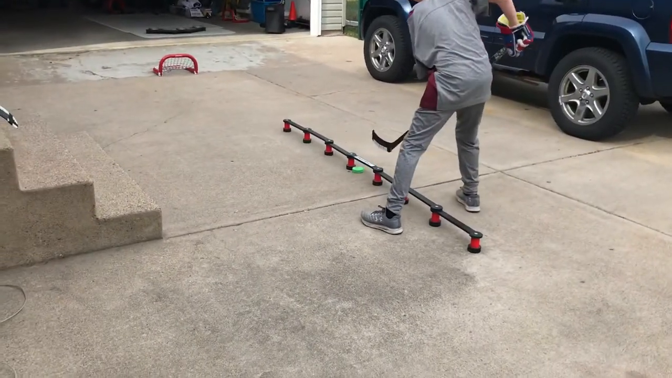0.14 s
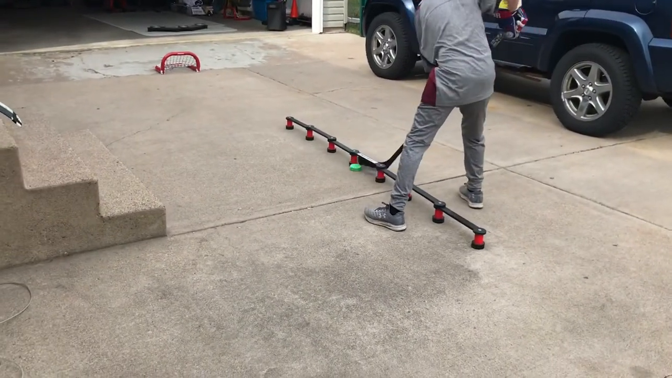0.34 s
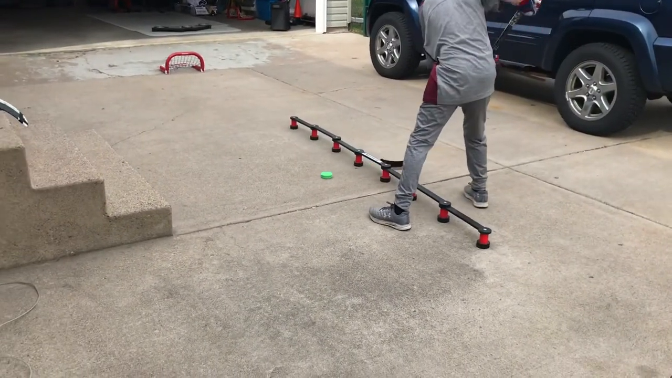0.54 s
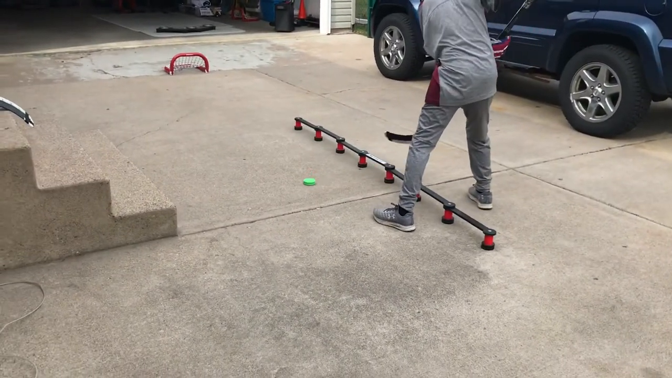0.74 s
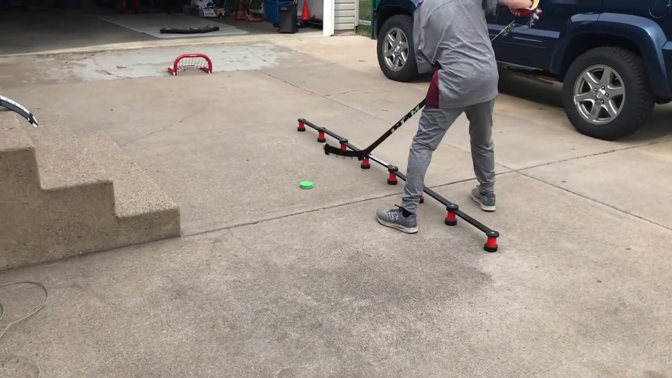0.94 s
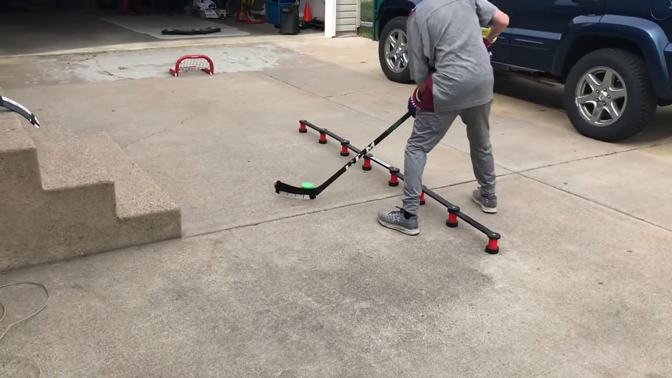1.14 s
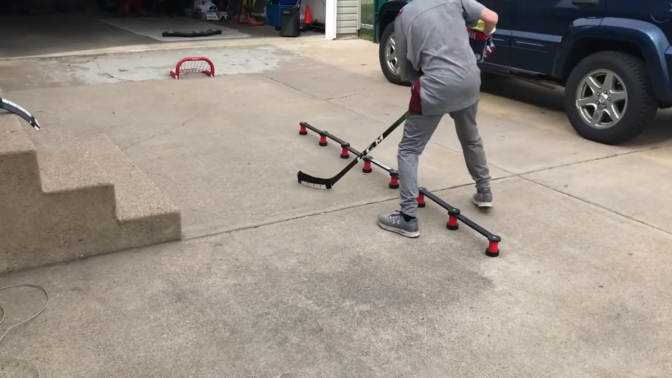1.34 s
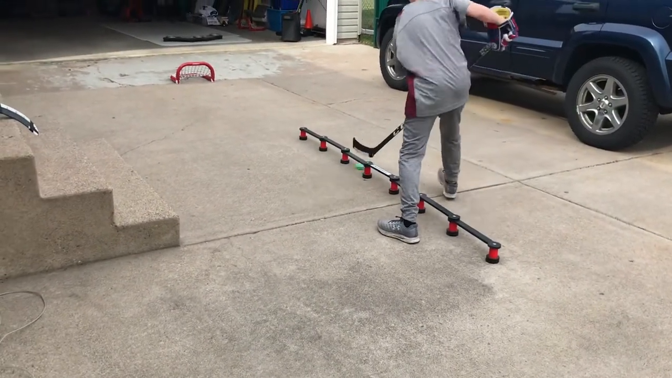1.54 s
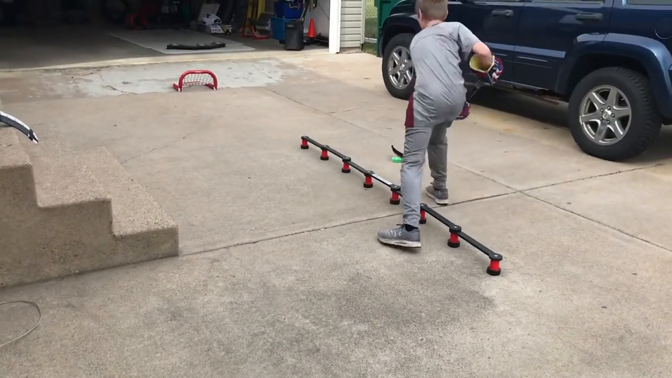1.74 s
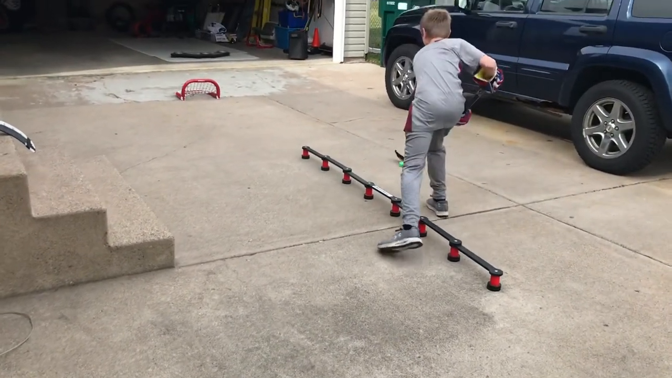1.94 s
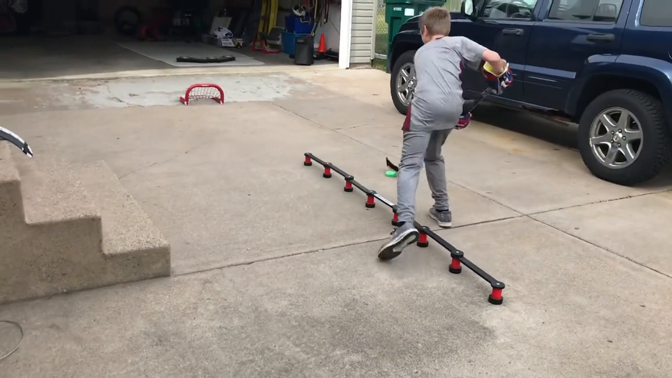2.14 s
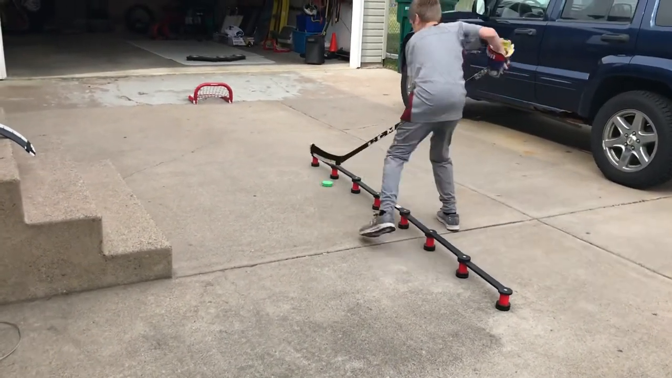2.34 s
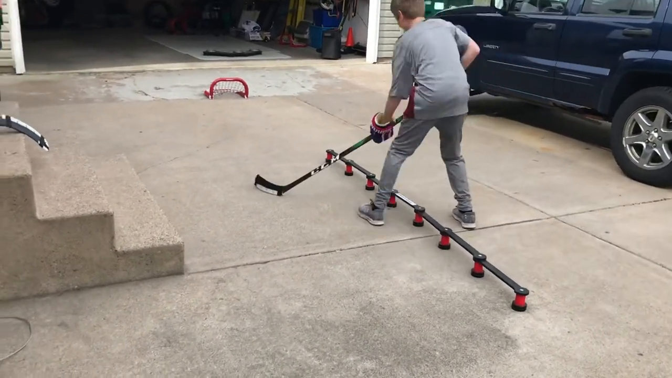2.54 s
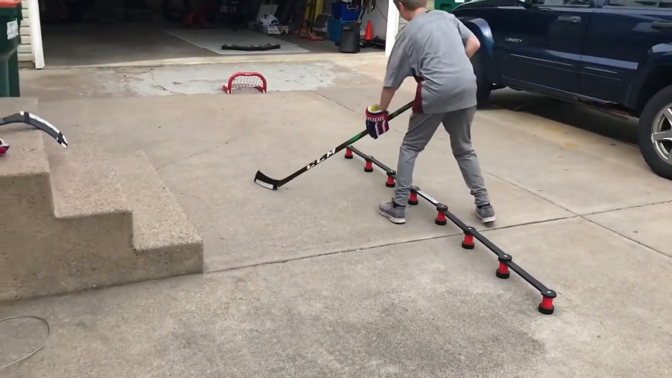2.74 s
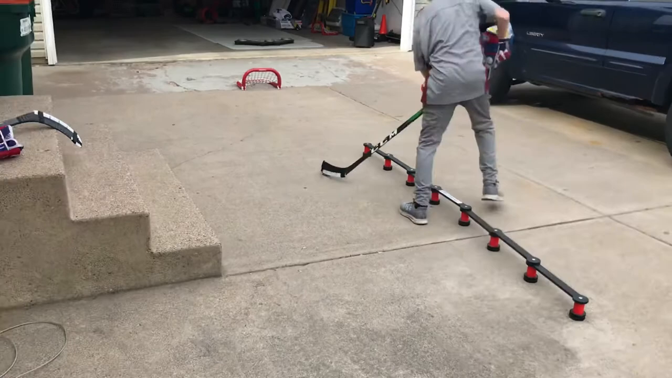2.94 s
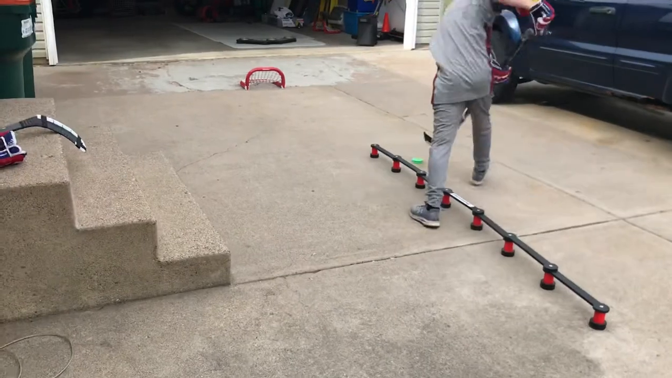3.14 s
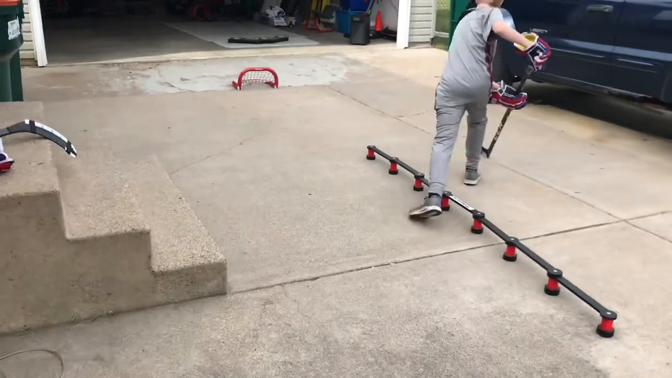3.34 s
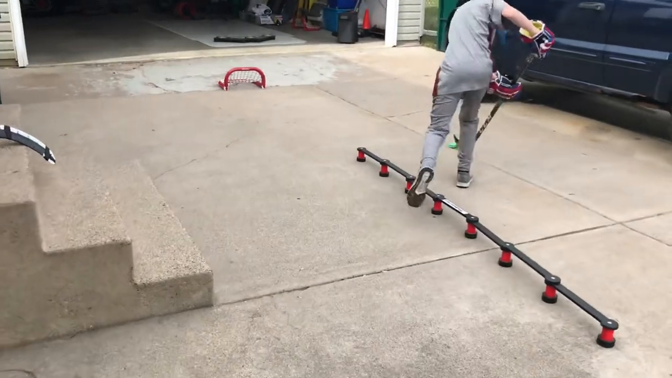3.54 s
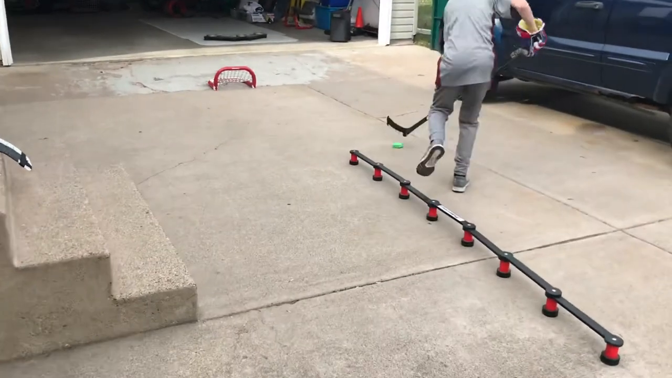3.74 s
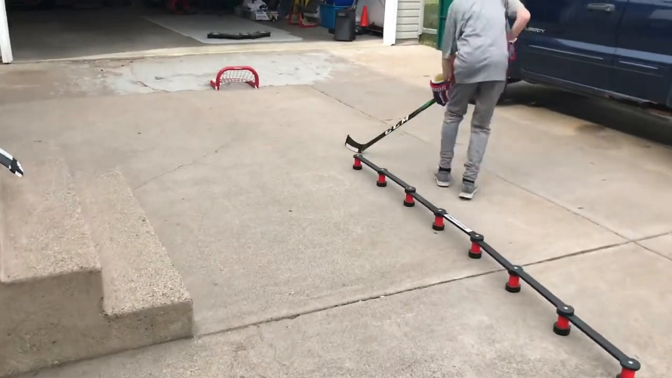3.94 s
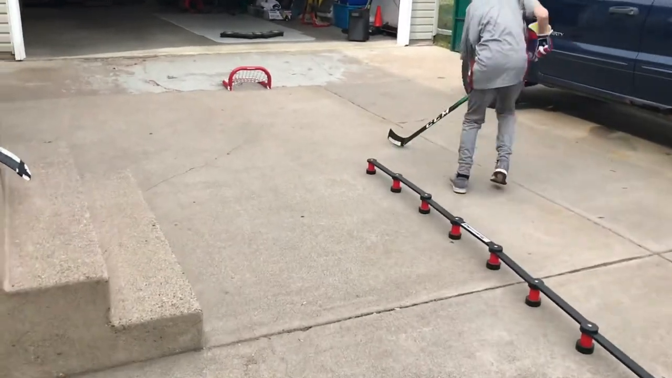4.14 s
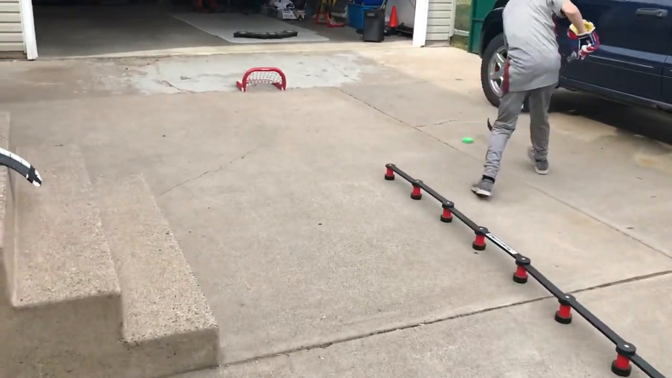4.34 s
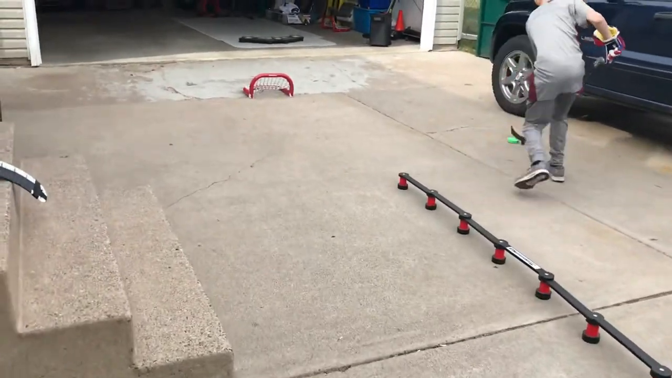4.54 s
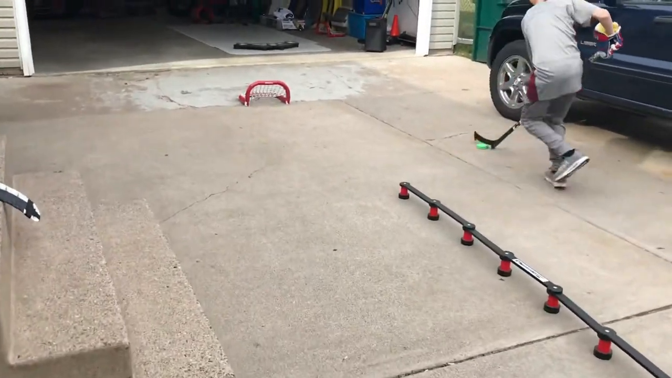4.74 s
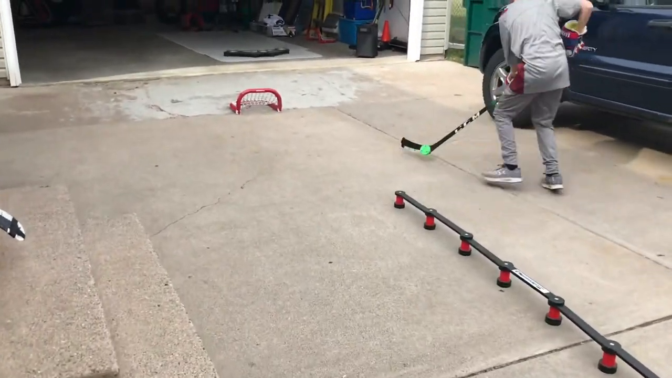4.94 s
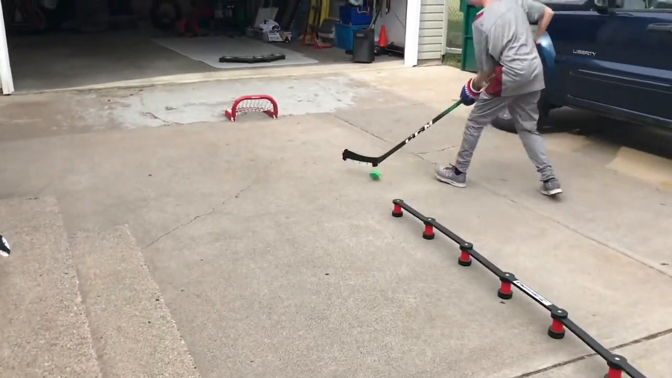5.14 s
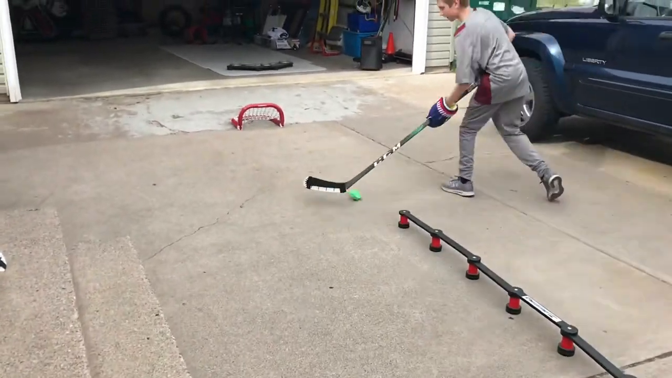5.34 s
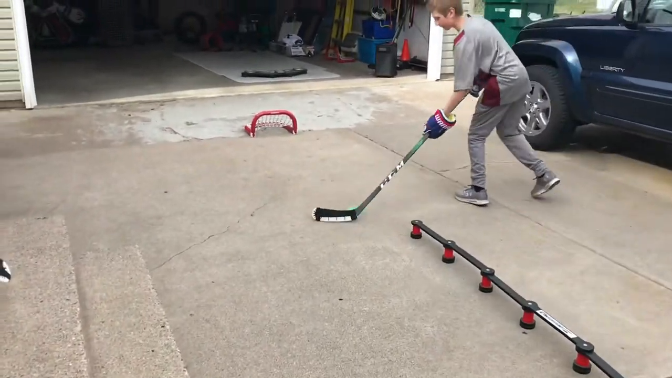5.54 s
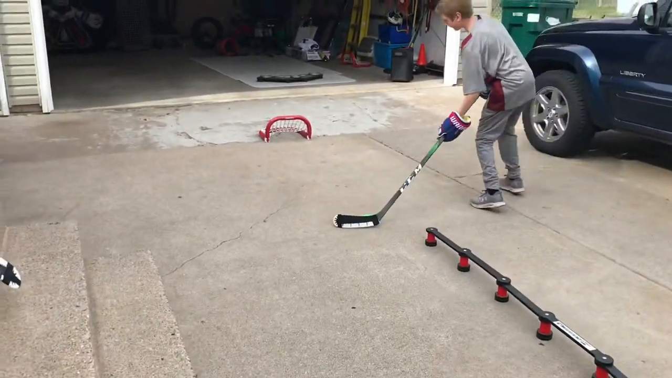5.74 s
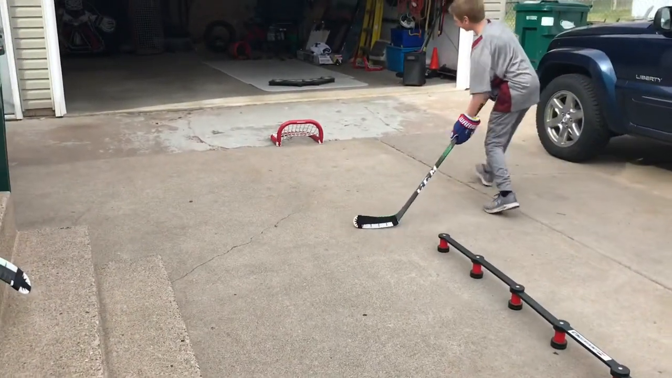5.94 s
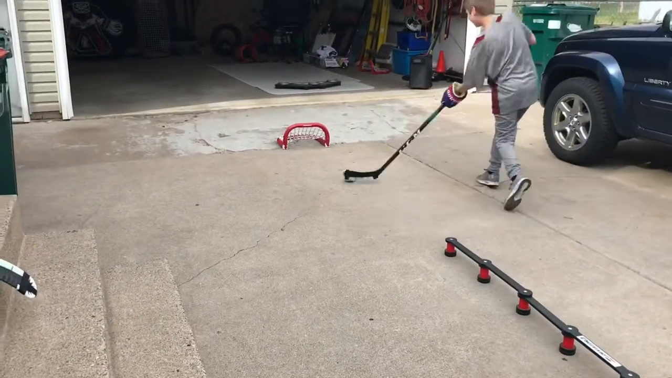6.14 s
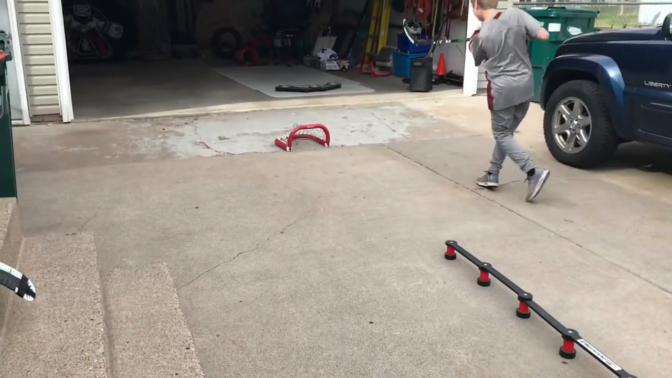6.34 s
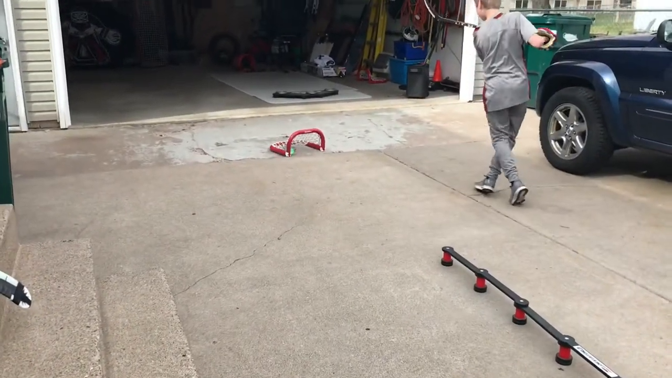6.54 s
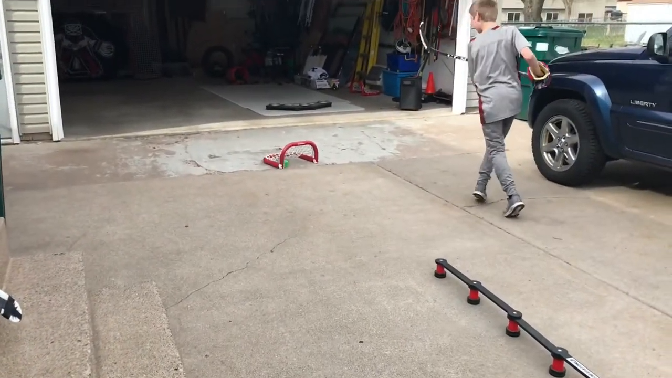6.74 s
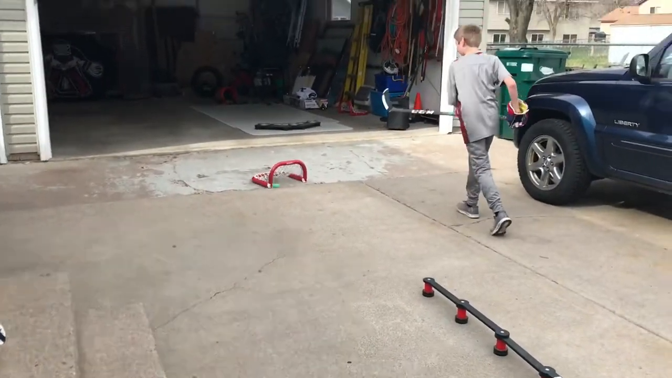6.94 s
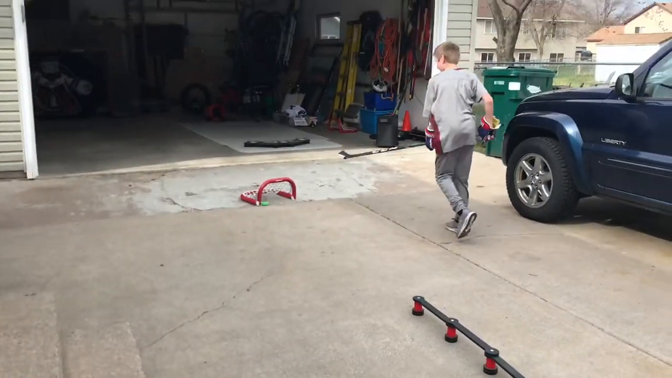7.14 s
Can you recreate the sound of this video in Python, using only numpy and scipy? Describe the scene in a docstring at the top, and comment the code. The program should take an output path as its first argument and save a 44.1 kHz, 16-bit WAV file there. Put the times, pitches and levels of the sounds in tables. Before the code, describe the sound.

A quiet driveway with low distant traffic, faint engine hum and soft wind puffs, heard from a few metres away. Two hollow stick knocks come at 0.25 and 0.3 s, then a thin gritty puck slide fades until 0.85. After a short lull, a scrape at 1.2 leads into a double knock, another raspy, ringing slide and small clacks. Knocks at 1.7, 2.5 and 2.85 alternate with slides and brief scrapes. From 3.3 the puck chatters on its rim, with taps near 3.9, 4.5 and 4.85 and light clacks between. Sharp plastic clacks land at 5.1 to 5.4. A gritty drag swells from 5.8 to 6.1, and at 6.2 the shot slams into a small steel goal: a very loud, bright, rattling crash in quick bursts. A rebound clack at 6.46 and smaller clatters die in short garage echo; one faint rising bird whistle sounds at 6.7, then quiet.

```python
"""A hard plastic puck is stickhandled over a concrete driveway, heard from a few metres away.
Blade blows excite resonances of shaft and blade; random grains make the blade scrape and the puck rasp and ring.
The puck also skips, wobbles and clacks; a long scrape ends in a shot that crashes into a small steel goal
and clatters on. Decaying random reflections give the yard and the open garage their echoes.
Behind it: shaped noise for traffic, wavering engine notes, puffs of wind and one faint bird whistle."""
import sys
import numpy as np
from scipy import signal
from scipy.fft import rfft, irfft
from scipy.io import wavfile
from scipy.ndimage import uniform_filter1d

SR = 44100
rng = np.random.default_rng(int(sys.argv[2]) if len(sys.argv) > 2 else 0)


def int16_out(signal):
    """Quantize to a 16-bit WAV file."""
    q = np.round(np.clip(np.atleast_2d(signal).T, -1, 1) * 32767)
    wavfile.write(sys.argv[1], SR, q.astype(np.int16))


N = 321048
TIME = np.arange(N) / SR  # seconds
BINS = np.fft.rfftfreq(4096, 1 / SR)  # Hz
HIT_SPAN = .02  # seconds over which the level of a blow is reckoned

# Resonances of the puck as it rings, rasps and ticks.
# Each row: frequency in Hz, width in Hz, relative level in dB.
PUCK_RING = [(3986, 200, -2), (4115, 86, 1.5), (8540, 290, -17.5), (12400, 900, -47)]
PUCK_RASP = [(2360, 260, -1.5), (2894, 1100, -1.5), (4160, 770, -2.5), (5234, 300, -2), (6000, 680, -5.5),
             (8540, 620, -3), (13050, 1500, -14.5), (5500, 2400, -35.5)]
PUCK_TICK = [(8545, 600, 7.5), (12500, 1300, -6), (11100, 3100, -25.5)]


def amp(db):
    """Decibels to gain."""
    return 10 ** (np.asarray(db) / 20)


def evened(x):
    """Scales to rms 1."""
    return x / np.sqrt(np.mean(x ** 2) + 1e-20)


def read(points, hz):
    """Reads a table along a log-frequency axis."""
    f, value = np.transpose(points)
    return np.interp(np.log(hz + 1), np.log(f), value)


def add(mix, s, sound):
    """Mixes a sound in at time s, in seconds."""
    part = mix[max(round(s * SR), 0):][:len(sound)]
    part += sound[:len(part)]


def through(x, taps):
    """Convolves and keeps the length."""
    return signal.oaconvolve(x, taps)[:len(x)]


def causal(gain):
    """Minimum-phase impulse response of a gain curve, with energy 1."""
    cepstrum = irfft(np.log(np.maximum(gain / gain.max(), 1e-4)))
    half = len(cepstrum) // 2
    # folding the cepstrum forward puts the energy as early as possible
    cepstrum[1:half] *= 2
    cepstrum[half + 1:] = 0
    taps = irfft(np.exp(rfft(cepstrum)))[:half]
    return taps / np.linalg.norm(taps)


def spectrum_taps(points):
    """Impulse response of a spectrum table."""
    return causal(amp(read(points, BINS)))


def body(modes):
    """Impulse response of a few damped resonances; small things radiate little bass."""
    power = np.zeros(len(BINS))
    for hz, width, db in modes:
        peak = amp(db) / (1 + ((BINS - hz) / (.75 * width)) ** 2)
        radiated = BINS ** 2 / (BINS ** 2 + (.25 * hz) ** 2)
        power += (peak * radiated) ** 2
    return causal(np.sqrt(power))


def contact(rebound, decay, chatter, bounce):
    """Force of one blow: a spike, a weaker opposite spike, and dying chatter on the rough surface."""
    t = np.arange(SR // 12) / SR
    rattle = rng.standard_normal(len(t)) * np.exp(-t / max(decay, 1e-4))
    force = chatter * rattle / np.linalg.norm(rattle)
    add(force, 0, np.ones(1))
    add(force, rebound, np.full(1, -bounce))
    # the force has an even spectrum: the colour comes from what is struck
    power = uniform_filter1d(abs(rfft(force, 2 * len(BINS) - 2)) ** 2, size=40)
    return through(force, causal(power ** -.5))


def struck(force, taps, db):
    """A body's answer to a blow; db is its energy as rms over HIT_SPAN."""
    sound = through(force, taps)
    return amp(db) * np.sqrt(HIT_SPAN * SR) * sound / np.linalg.norm(sound)


def wander(step_s):
    """A random curve of unit size with a new value every step."""
    knots = np.arange(0, N / SR + step_s, step_s)
    return np.interp(TIME, knots, rng.standard_normal(SR)[:len(knots)])


def patches(patchy_db, patch_s):
    """A gain that wanders quickly at random."""
    return amp(patchy_db * wander(patch_s))


def grit(per_s, spread_db, patchy_db, patch_s):
    """Sand grains of uneven size, met in clumps as something slides over the slab."""
    size = amp(spread_db * np.minimum(rng.exponential(1, N), 4)) * rng.choice([-1, 1], N)
    met = rng.random(N) < per_s / SR
    return evened(size * met * patches(patchy_db, patch_s))


def resonate(x, hz, width):
    """A steep resonance that follows the curve hz."""
    turn = np.exp(2j * np.pi * np.cumsum(hz) / SR)
    r = np.exp(-np.pi * width / SR)
    # shift the curve down to 0 Hz, low-pass there, shift back up
    smooth = signal.lfilter([(1 - r) ** 2], [1, -2 * r, r * r], x / turn + 1e-18)
    return (turn * smooth).real


def blade_knocks():
    """Each blow thuds in the shaft, knocks in the hollow blade and cracks at its face."""
    # The blade on puck and slab. Each row: start in seconds, rebound delay in seconds,
    # chatter time constant in seconds, thud pitch in Hz, reference for the hollow pitches in Hz,
    # thud level in dB, knock level in dB, crack level in dB.
    knocks = [(0.2454, 0.0017, .019, 348, 1670, -32.5, -33.5, -36.5),
              (0.3006, 0.0034, 0.0043, 296, 1714, -31, -23, -27.5),
              (1.168, 0.0015, 0.004, 338, 1450, -40, -38, -32.5),
              (1.259, 0.00064, 0.0018, 340, 1550, -45, -28.5, -42),
              (1.2749, 0.0011, 0.003, 363, 1340, -23.5, -24.5, -29.5),
              (1.7089, 0.002, 0.016, 284, 1330, -28, -26, -23.5),
              (2.4857, 0.0015, 0.0055, 276, 1230, -32.5, -24, -19),
              (2.548, 0.00068, .0058, 335, 1300, -30.5, -29, -33.5),
              (2.833, 0.0017, 0.0024, 316, 1050, -51, -36.5, -49),
              (2.8528, 0.00046, .0013, 320, 1190, -49, -40, -45),
              (3.256, 0.0073, 0.016, 217, 1130, -30, -33.5, -28.5),
              (3.328, 0.0054, 0.013, 300, 1160, -28, -29.5, -26.5),
              (3.5246, 0.005, 0.011, 253, 1120, -43, -43, -39),
              (3.878, 0.0063, 0.0094, 210, 1470, -41, -25, -25),
              (3.9407, .007, 0.014, 308, 1050, -34.5, -30, -31),
              (4.4986, 0.0032, 0.0084, 245, 1100, -32.5, -27.5, -23.5),
              (4.633, 0.0058, .0083, 248, 1400, -44, -39.5, -30),
              (4.849, 0.0052, 0.006, 240, 1550, -28, -27.5, -20.5),
              (4.931, .006, 0.0051, 255, 1220, -56, -37, -44),
              (5.444, 0.0059, 0.0078, 246, 1170, -37.5, -33, -34),
              (5.553, 0.00067, .0023, 296, 1150, -51.5, -48.5, -49),
              (5.931, 0.0021, 0.0064, 387, 980, -31, -24.5, -37)]
    # Modes of the shaft. Each row: multiple of the thud pitch, width in Hz, relative level in dB.
    thud_modes = [(1, 61, 1.5), (1.35, 102, -5), (2.6, 500, -6)]
    # The blade's upper resonances, varied and narrowed below.
    # Each row: centre in Hz, reference width in Hz, mean relative level in dB.
    crack_modes = [(2760, 1480, 0), (3990, 700, 3), (5610, 2330, -4.5)]
    # Its edge. Each row: frequency in Hz, width in Hz, relative level in dB.
    tick_modes = [(8520, 1200, -1), (11700, 2000, -5), (14300, 4800, -11.5)]
    # The blade's own note, whatever the spot: frequency in Hz, width in Hz, relative level in dB.
    blade_note = (1045, 98, 0.75)
    tick_db = -9.5  # the edge's tick, relative to the crack
    out = np.zeros(N)
    tick = body(tick_modes)
    for s, rebound, decay, thud_hz, hz, thud_db, knock_db, crack_db in knocks:
        force = contact(rebound, decay, chatter=1.7, bounce=.8)
        # the thud's pitch depends on grip and flex
        thud = body([(thud_hz * f, width, db) for f, width, db in thud_modes])
        # the hollow pitch depends on where the blade is met
        hollow = body([(.84 * hz, 200, -1), (1.08 * hz, 200, 0), (1.3 * hz, 380, -3), blade_note])
        # and so does the mix of its upper resonances
        crack = body([(f * rng.uniform(.93, 1.07), .7 * width, db + rng.normal(0, 2))
                      for f, width, db in crack_modes])
        blow = struck(force, thud, thud_db) - struck(force, hollow, knock_db)
        blow += struck(force, crack, crack_db) - struck(force, tick, crack_db + tick_db)
        add(out, s, blow)
        # the edge grazes the grit from just before the blow lands
        add(out, s - .003, struck(rng.standard_normal(SR // 200), crack, crack_db - 19))
    return out


def blade_scrapes():
    """The dragged blade drums on the grit and hisses along its edge; level follows pressure until it lifts."""
    # Drags on the slab. Each row: start in seconds, length in seconds, final hollow level in dB,
    # final grit level in dB, hollow swell in dB (negative: it eases off).
    strokes = [(0.462, 0.017, -45, -70, -10), (1.169, 0.16, -35.5, -38, 10),
               (2.015, 0.058, -51.5, -56.5, -2), (2.112, 0.059, -43.5, -62, 9),
               (2.625, 0.052, -36, -38.5, 8), (2.753, 0.033, -37.5, -40, 6.5),
               (2.794, 0.071, -38, -41, 2.5), (3.342, 0.044, -51, -38, 3), (3.397, 0.18, -46, -78.5, 3),
               (3.986, 0.055, -38.5, -62, 5), (4.418, 0.0094, -37.5, -52, 1.5), (4.732, 0.039, -38, -52, 0),
               (5.808, 0.025, -41.5, -45, 3), (5.862, .07, -30, -42, 7), (5.946, 0.079, -32, -36, 4.5),
               (6.015, 0.086, -23.5, -21.5, 6)]
    # Spectra of the hollow body and the gritty edge. Each row: frequency in Hz, relative level in dB.
    drag_body = [(80, -29.5), (300, -6.5), (560, -6), (900, 1.5), (1100, 2), (1600, -1), (2300, -7.5),
                 (3500, -34), (8000, -42)]
    drag_grit = [(1200, -38), (2700, 1.5), (4000, 1.5), (6000, -6.5), (7500, -16.5), (9000, -15.5),
                 (12500, -20), (16000, -28)]
    touch_s, lift_s = .01, 0.0052  # seconds to meet the slab; time constant of lifting
    bite = 1.6  # the grit's swell in dB is this many times the hollow body's
    crush_db = -36  # grit level at which crackle and dense rasp have equal power
    hollow, hiss = np.zeros((2, N))
    t = np.arange(SR // 2) / SR
    for s, length, hollow_db, grit_db, swell_db in strokes:
        touch = np.minimum(t / touch_s, 1) * np.exp(-np.maximum(t - length, 0) / lift_s)
        pressure_db = swell_db * np.minimum(t / length - 1, 0)
        add(hollow, s, touch * amp(hollow_db + pressure_db))
        add(hiss, s, touch * amp(grit_db + bite * pressure_db))
    coarse = grit(per_s=1400, spread_db=3.6, patchy_db=3, patch_s=.007)
    dense = grit(per_s=7000, spread_db=2.2, patchy_db=1.8, patch_s=.007)
    # pressed hard, the blade meets many grains at once
    crushing = hiss / (hiss + amp(crush_db))
    grains = np.sqrt(1 - crushing) * coarse + np.sqrt(crushing) * dense
    drumming = through(grains * hollow, spectrum_taps(drag_body))
    hissing = through(grains * hiss, spectrum_taps(drag_grit))
    return drumming + hissing


def puck_runs():
    """Strength of the puck's rasp and ring: a push starts each run, its speed changes, a catch ends it."""
    # Slides from a push until caught. Each row: start in seconds, end in seconds, initial rasp gain in dB,
    # initial ring gain in dB, slowing in dB per second (negative: it grows).
    runs = [(-.02, 0.095, -64, -60.5, 41), (0.317, 0.857, -52.5, -44, 30), (1.331, 1.72, -46.5, -45.5, 8),
            (2.069, 2.47, -47, -44, 1), (2.87, 3.229, -44.5, -44, 2.5), (3.407, 3.854, -51, -52, -3),
            (3.964, 4.497, -45.5, -45, 7), (4.506, 4.9, -43.5, -52, -1), (5.157, 5.35, -47.5, -50, 59)]
    push_s, catch_s = 0.045, 0.024  # seconds to gather speed; seconds to be stopped
    rasp, ring = np.zeros((2, N))
    for start, end, rasp_db, ring_db, slowing in runs:
        age = np.maximum(TIME - start, 0)
        pushed = np.minimum(age / push_s, 1)
        caught = np.clip(1 - (TIME - end) / catch_s, 0, 1)
        speed = pushed * caught * amp(-slowing * age)
        rasp += amp(rasp_db) * speed
        ring += amp(ring_db) * speed
    return rasp, ring


def puck_slide():
    """Grains tick against the sliding puck, which rasps and rings at its own pitch; coarse sand crackles."""
    wander_hz, wander_spread_hz, wander_width_hz, wander_db = 2950, 245, 130, -6
    skips_per_s, skip_db = 22, -18.5  # small hops on pebbles, gain relative to the rasp's
    rasp, ring = puck_runs()
    rasping = np.zeros(N)
    for hz, width, db in PUCK_RASP:
        # the contact wanders round the rim, so each resonance meets its own clumps of grains
        grains = grit(per_s=800, spread_db=3.5, patchy_db=4, patch_s=.012)
        rasping += amp(db) * np.sqrt(width) * through(grains, body([(hz, width, 0)]))
    coarse = grit(per_s=190, spread_db=4.5, patchy_db=3, patch_s=.02)
    # the rasp's pitch shifts as the puck tilts
    tilt_hz = wander_hz + wander_spread_hz * wander(step_s=.035)
    tilting = evened(resonate(coarse, tilt_hz, wander_width_hz))
    crackle = through(coarse, body(PUCK_RASP))
    rasping = evened(rasping) + .8 * crackle + amp(wander_db) * tilting
    # the small disc radiates little below its lowest resonance
    rasping = signal.sosfilt(signal.butter(4, 2100, "highpass", fs=SR, output="sos"), rasping)
    fine = grit(per_s=1500, spread_db=3, patchy_db=2.5, patch_s=.015)
    # the puck rocks, so its ring comes and goes
    fine = fine * evened(patches(patchy_db=2.5, patch_s=.04))
    skips = amp(skip_db) * grit(per_s=skips_per_s, spread_db=2, patchy_db=1, patch_s=.05)
    rasping = rasping * evened(patches(patchy_db=1.8, patch_s=.022))
    ringing = through(fine * ring, body(PUCK_RING))
    return rasp * rasping + ringing + through(skips * rasp, body(PUCK_TICK))


def puck_wobbles():
    """The puck, up on its edge, chatters on its rim in a lower mode and settles."""
    # Each row: start in seconds, length in seconds, initial level in dB.
    wobbles = [(3.323, 0.72, -47), (5.109, 0.2, -41)]
    out = np.zeros(N)
    for s, length, db in wobbles:
        settling = np.linspace(1, 0, int(length * SR))
        add(out, s, amp(db) * settling * rng.standard_normal(len(settling)))
    return through(out, body([(2486, 290, 0)]))


def puck_clacks():
    """The puck's rim drops on the slab and rattles flat, a little differently each time."""
    # Skips, landings and nudges. Each row: start in seconds, rasp level in dB, ring level in dB, tick level in dB.
    clacks = [(1.4136, -42, -35, -50), (1.504, -46, -39, -43.5), (2.3292, -39.5, -40, -47),
              (2.905, -42, -36.5, -41), (2.973, -43, -43, -38), (3.0484, -44, -35.5, -36.5),
              (3.628, -40, -63, -39), (3.7116, -40, -50, -41), (4.1642, -67, -40, -54),
              (4.2138, -52, -37.5, -68), (4.2754, -51, -56, -41), (4.286, -33, -33, -50),
              (4.705, -46, -38.5, -37.5), (4.7483, -35, -57, -33.5), (4.7708, -37, -38, -35.5),
              (5.1122, -27.5, -40.5, -24), (5.1638, -26.5, -48, -25.5), (5.236, -41.5, -40, -38.5),
              (5.3764, -30.5, -28, -65), (5.9338, -54, -41, -32), (6.138, -25.5, -33.5, -26),
              (6.193, -35.5, -40.5, -38.5), (6.32, -46, -31, -47), (6.4576, -22, -29, -41),
              (6.8458, -38.5, -46, -48.5)]
    # The puck landing flat, and its rebound off something hard.
    # Each row: frequency in Hz, width in Hz, relative level in dB.
    slap_modes = [(270, 160, -8), (1260, 610, 0.5)]
    rebound_modes = [(2400, 160, -5), (2693, 160, 2), (3100, 160, -5)]
    slap_db = -11  # relative to the rasp
    rebound_s, rebound_db = 6.459, -24
    out = np.zeros(N)
    rasp, ring, tick, slap = body(PUCK_RASP), body(PUCK_RING), body(PUCK_TICK), body(slap_modes)
    for s, rasp_db, ring_db, tick_db in clacks:
        force = contact(rebound=rng.uniform(.002, .008), decay=.01, chatter=2, bounce=.55)
        clack = struck(force, rasp, rasp_db) + struck(force, ring, ring_db)
        clack += struck(force, tick, tick_db) + struck(force, slap, rasp_db + slap_db)
        add(out, s, clack)
    # the rebound borrows the force of the last clack
    add(out, rebound_s, struck(force, body(rebound_modes), rebound_db))
    return out


def shot():
    """The shot rattles the goal hard and leaves goal and puck ringing."""
    # Each row: start in seconds, rebound delay in seconds, chatter time constant in seconds, level in dB.
    crashes = [(6.2117, 0.005, 0.017, -12), (6.238, 0.0096, 0.012, -12), (6.25, 0.0061, 0.013, -12),
               (6.301, .004, 0.012, -20.5), (6.465, 0.0066, 0.022, -30.5), (6.523, 0.0036, 0.013, -34.5)]
    # Spectrum of the bang. Each row: frequency in Hz, relative level in dB.
    crash_spectrum = [(60, -49), (330, -13.5), (600, -21.5), (1100, -8), (1900, -6.5), (2700, -5.5),
                      (3900, -2.5), (5200, -5), (8000, -11), (11200, -14), (16000, -25)]
    # Ringing modes of the crash: the steel goal's, with the puck's own ring near 4 kHz.
    # Each row: frequency in Hz, relative level in dB, 60 dB decay time in seconds.
    ring_modes = [(1244, -15, .4), (2285, -7, .3), (3155, -8, .25), (3945, -9, .3), (4130, -10, .3),
                  (5570, -12, .25), (6934, -10, .28)]
    out, t = np.zeros(N), np.arange(SR) / SR
    bang = spectrum_taps(crash_spectrum)
    for s, rebound, decay, db in crashes:
        add(out, s, struck(contact(rebound, decay, chatter=3.2, bounce=0.81), bang, db))
        ring = np.zeros(SR)
        for hz, mode_db, t60 in ring_modes:
            ring += amp(mode_db - 60 * t / t60) * np.sin(2 * np.pi * (hz * t + rng.random()))
        add(out, s, amp(db - 10.5) * ring)
    return out


def reverb(t60s, first_s, build_s):
    """Sparse reflections of random sign that build up, then die at each band's own speed."""
    taps = rng.choice([-1., 1.], SR) * (rng.random(SR) < 3000 / SR)
    hz, t, z = signal.stft(taps, SR, nperseg=256)
    decay = amp(-60 * t / read(t60s, hz)[:, None])
    tail = signal.istft(z * decay, SR, nperseg=256)[1][:SR]
    tail *= 1 - np.exp(-np.maximum(np.arange(SR) / SR - first_s, 0) / build_s)
    return tail / np.linalg.norm(tail)


def moving_echo(x, t60s, first_s, build_s, count=3):
    """The reflections change as player and puck move: several tails take turns."""
    turn = TIME / .11  # the next tail takes over every 0.11 s
    out = np.zeros(N)
    # distance of each tail from its turn
    away = [abs((turn - k + count / 2) % count - count / 2) for k in range(count)]
    for d in away:
        out += through(x * np.sqrt(np.maximum(1 - d, 0)), reverb(t60s, first_s, build_s))
    return out


def bird():
    """One faint rising whistle from far off."""
    out, hz = np.zeros(N), np.linspace(4050, 5600, int(.11 * SR))
    whistle = np.sin(2 * np.pi * np.cumsum(hz) / SR) * np.hanning(len(hz))
    add(out, 6.705, amp(-62) * whistle)
    return out


def street():
    """Distant traffic as shaped noise, wavering sines for engines, puffs of low wind on the microphone."""
    # Traffic spectrum. Each row: frequency in Hz, relative level in dB.
    traffic_spectrum = [(20, -37), (35, -10.5), (55, -8), (130, -9.5), (270, -17.5), (550, -26.5),
                        (950, -20.5), (1660, -31), (3000, -41), (6500, -45.5), (16000, -52.5)]
    # Far engines. Each row: start in seconds, end in seconds, mean pitch in Hz, level in dB.
    hums = [(.35, 1.185, 176.4, -61.5), (3.892, 7.6, 112.8, -59.5)]
    # Gusts on the microphone. Each row: start in seconds, length in seconds, level in dB.
    gusts = [(0, 0.15, -44.5), (0.949, 0.12, -52), (1.626, .28, -46.5)]
    gain = amp(read(traffic_spectrum, np.fft.rfftfreq(N, 1 / SR)))
    out = amp(-54) * evened(irfft(rfft(rng.standard_normal(N)) * gain, N))
    for start, end, hz, db in hums:
        count = int((end - start) * SR)
        waver = evened(uniform_filter1d(rng.standard_normal(2 * N), size=9000))[:count]
        tone = np.sin(2 * np.pi * np.cumsum(hz * (1 + 0.0062 * waver)) / SR)
        add(out, start, amp(db) * evened(tone * signal.windows.tukey(count, .3)))
    for s, length, db in gusts:
        count = int(length * SR)
        puff = through(rng.standard_normal(SR), body([(58.0, 25, 0)]))[-count:]
        add(out, s, amp(db) * evened(puff * np.hanning(count)))
    return out


def scene():
    """Car and steps scatter the sound at once, the house later; the shot ends by the open garage."""
    # Reverberation. Each row: frequency in Hz, 60 dB decay time in seconds.
    yard_t60s = [(200, 0.48), (4000, 0.51), (9000, 0.4), (16000, 0.63)]
    garage_t60s = [(200, 0.96), (3500, 0.66), (7000, 0.54), (16000, 0.62)]
    play = blade_knocks() + blade_scrapes() + puck_slide() + puck_wobbles() + puck_clacks() + shot()
    near = moving_echo(play, [(200, 0.096), (12000, 0.073)], first_s=.003, build_s=.022, count=4)
    yard = moving_echo(play, yard_t60s, first_s=.008, build_s=.004, count=4)
    # only the shot and what follows reach into the garage
    by_garage = np.interp(TIME, [6.15, 6.21], [0, 1])
    garage = moving_echo(play * by_garage, garage_t60s, first_s=0.004, build_s=0.0092)
    echoes = amp(-12.0) * near + amp(-11.0) * yard + amp(-13) * garage
    return (play + echoes + street() + bird())[None]


def record(dry):
    """The loudest peaks are rounded off; then the band limit."""
    edge_hz = 15950
    rounded = dry / (1 + dry ** 6) ** (1 / 6)
    low_pass = signal.firwin(401, edge_hz, window=("kaiser", 9), fs=SR)
    return signal.oaconvolve(rounded, low_pass[None], "same")


dry = scene()
out = record(dry)
int16_out(out)
```